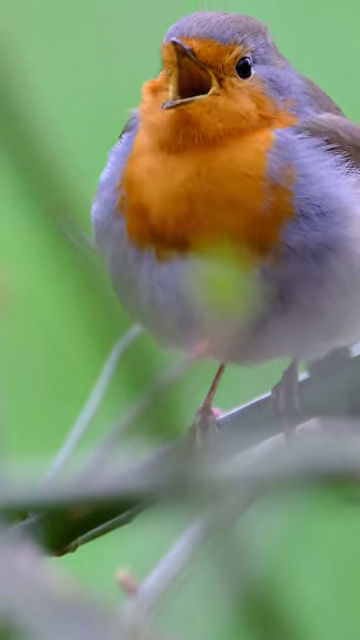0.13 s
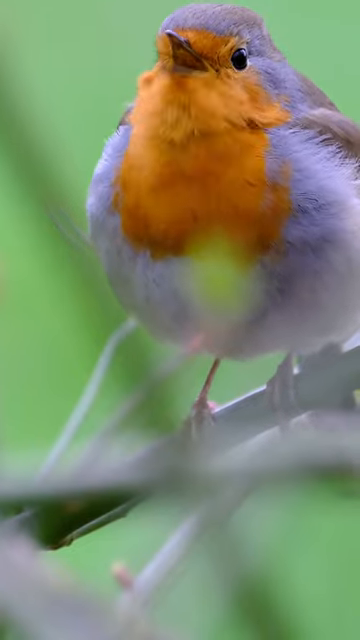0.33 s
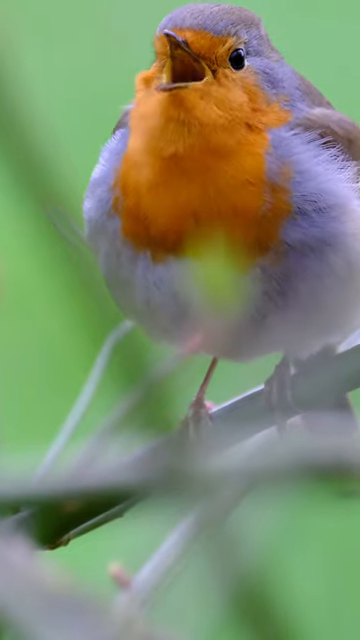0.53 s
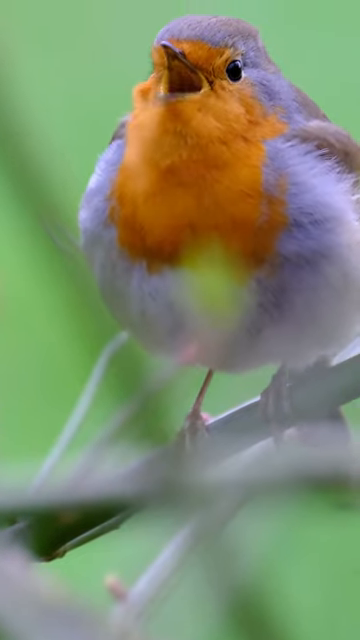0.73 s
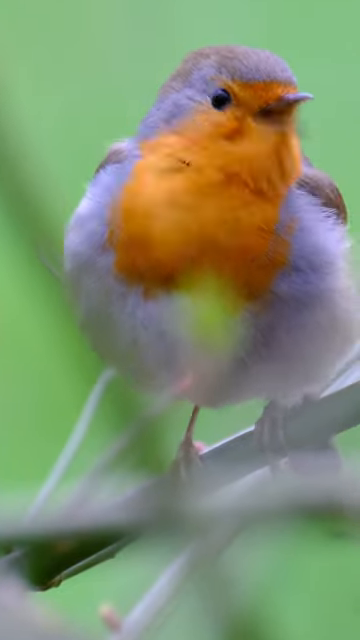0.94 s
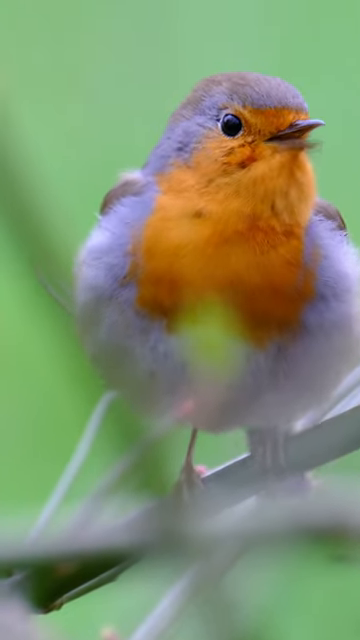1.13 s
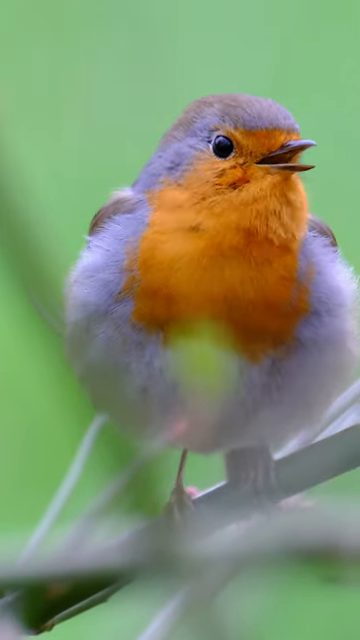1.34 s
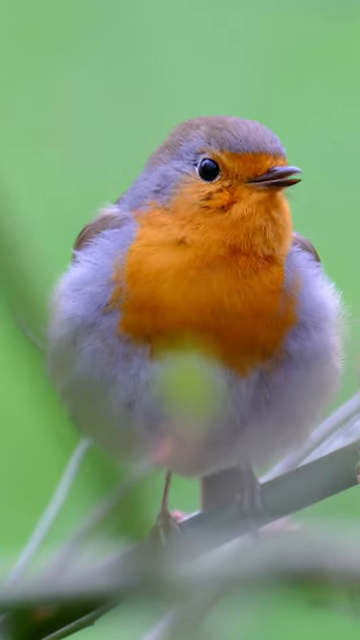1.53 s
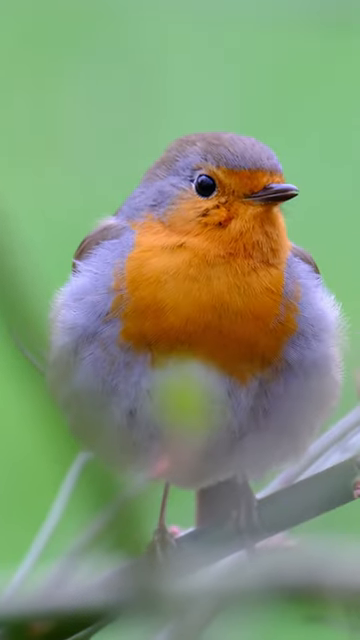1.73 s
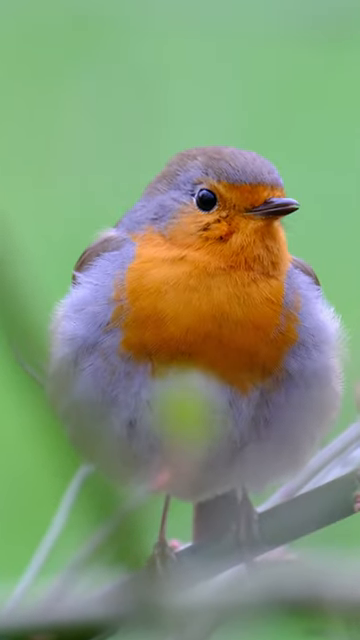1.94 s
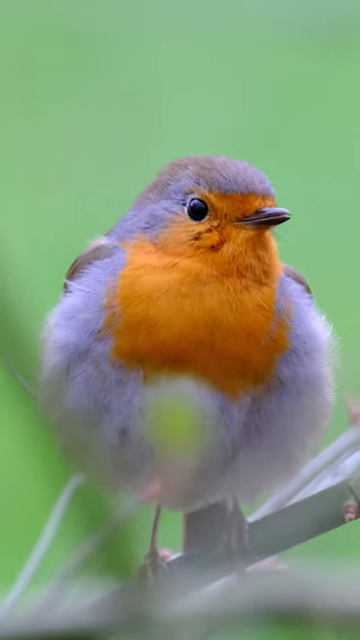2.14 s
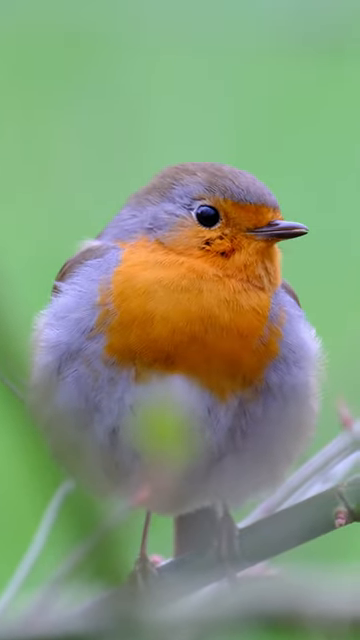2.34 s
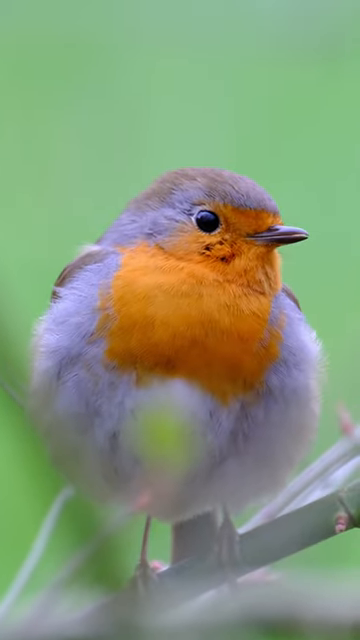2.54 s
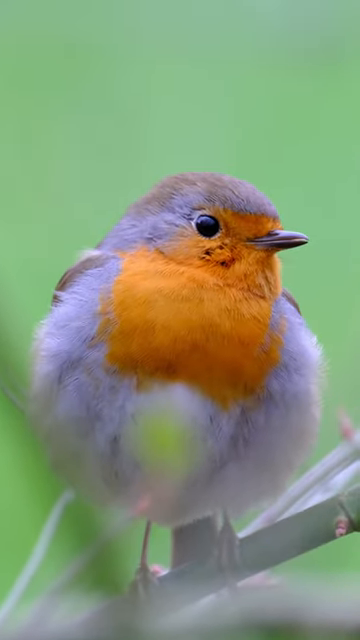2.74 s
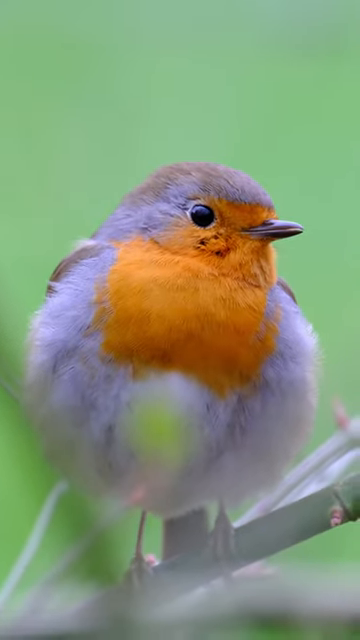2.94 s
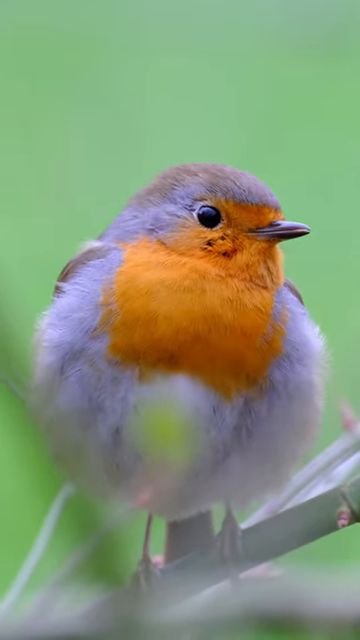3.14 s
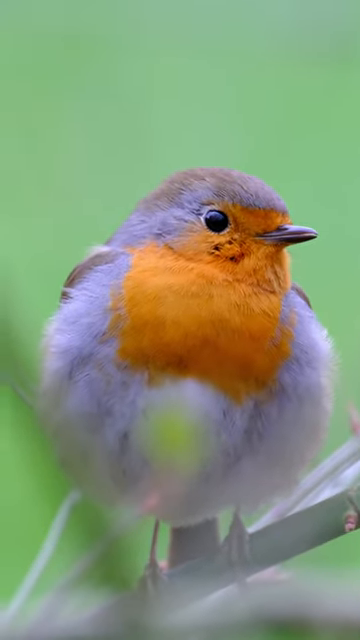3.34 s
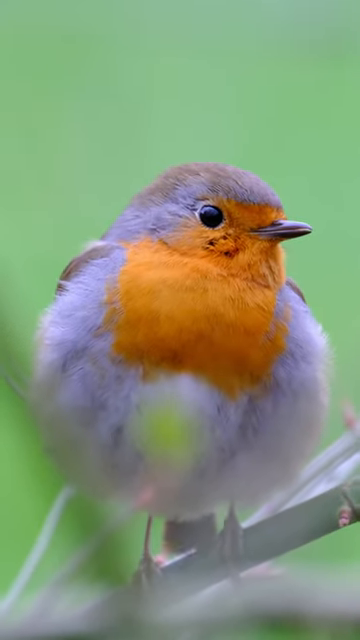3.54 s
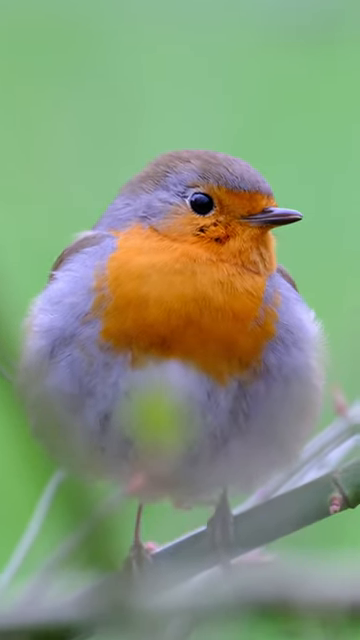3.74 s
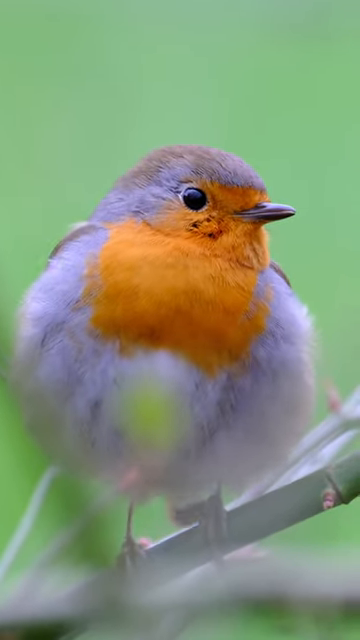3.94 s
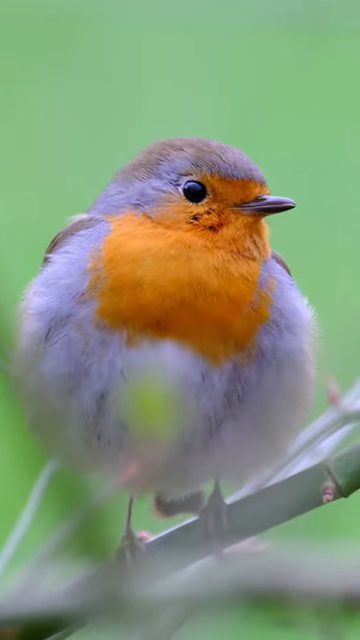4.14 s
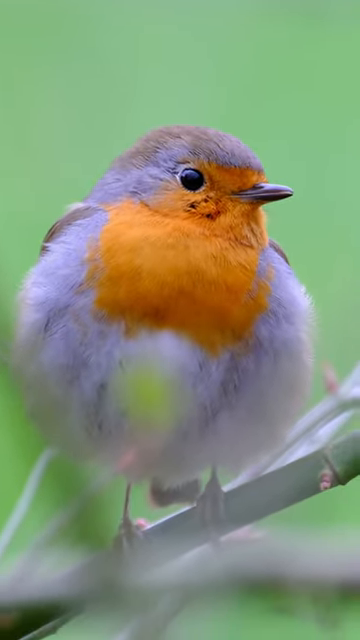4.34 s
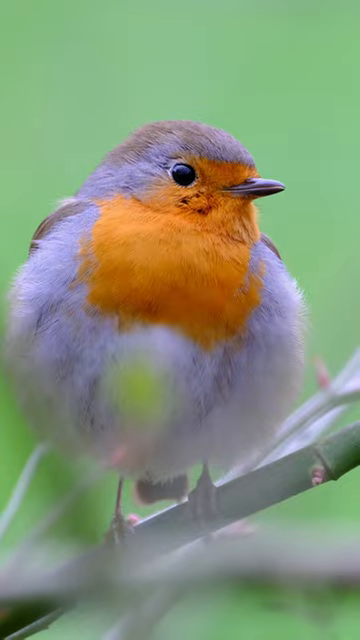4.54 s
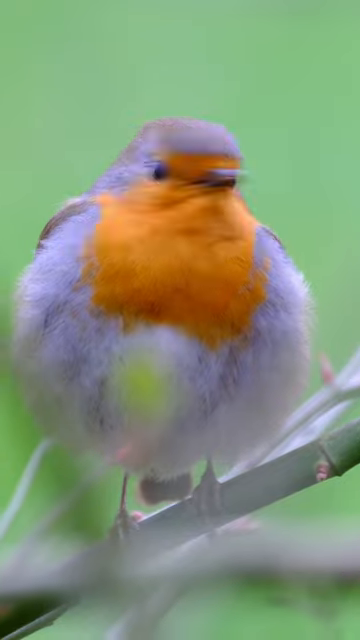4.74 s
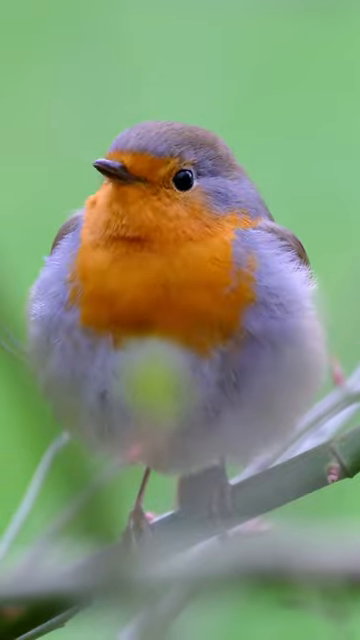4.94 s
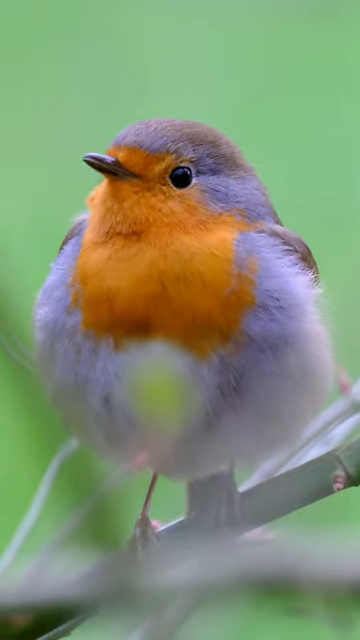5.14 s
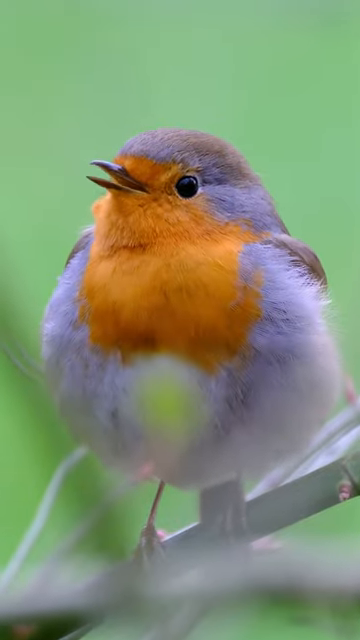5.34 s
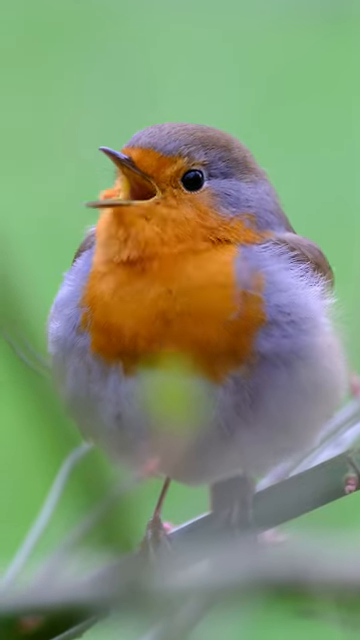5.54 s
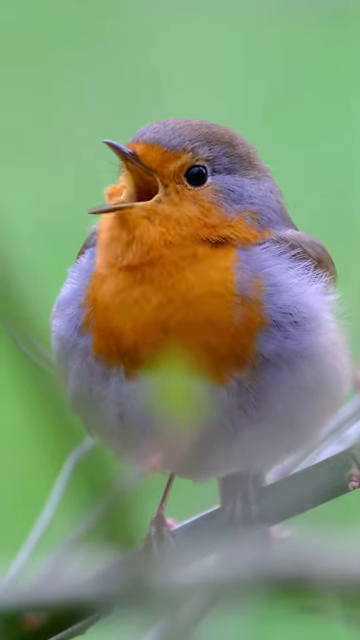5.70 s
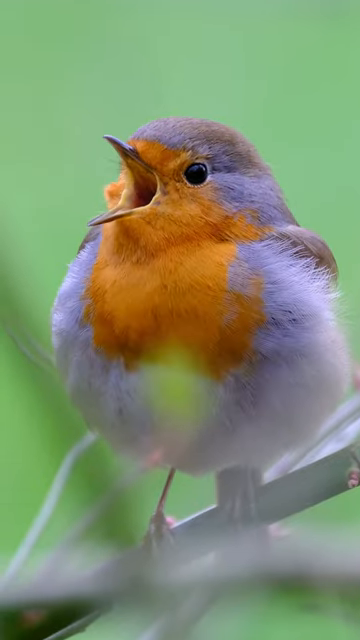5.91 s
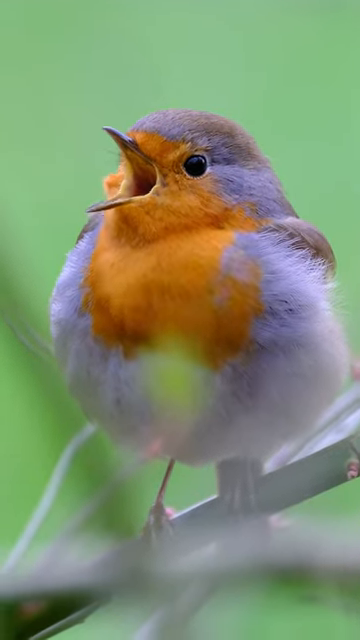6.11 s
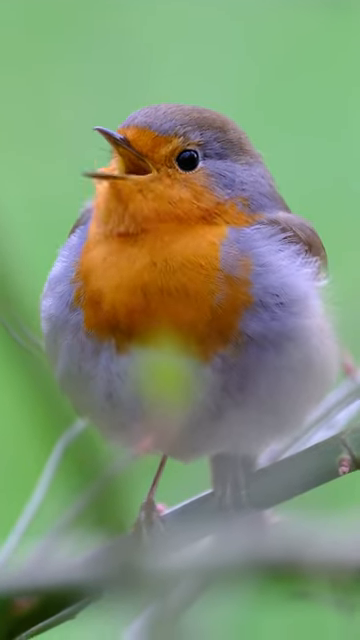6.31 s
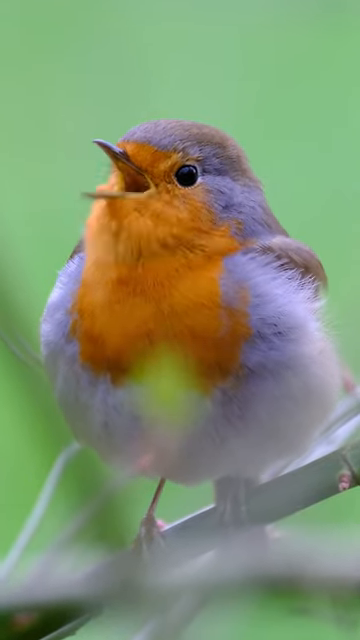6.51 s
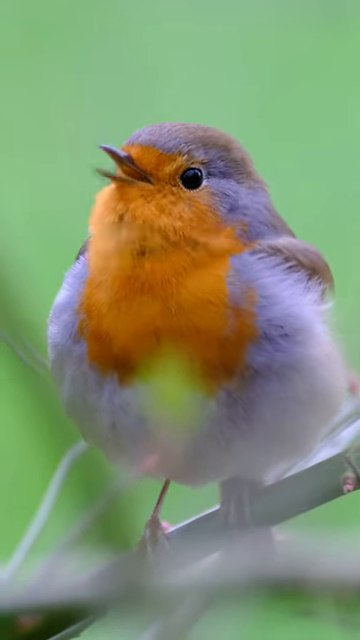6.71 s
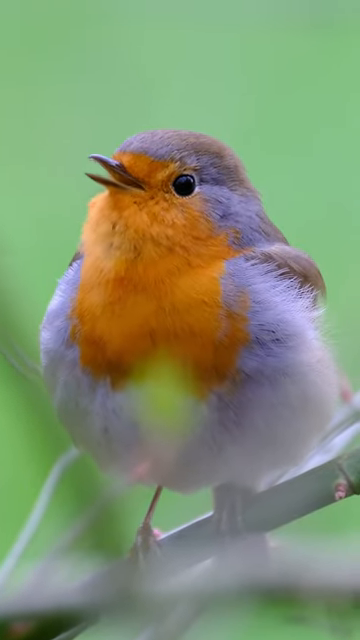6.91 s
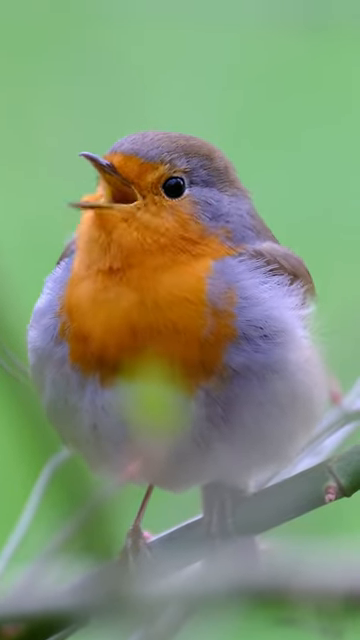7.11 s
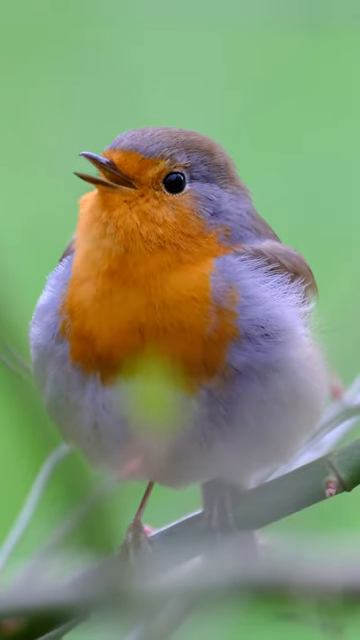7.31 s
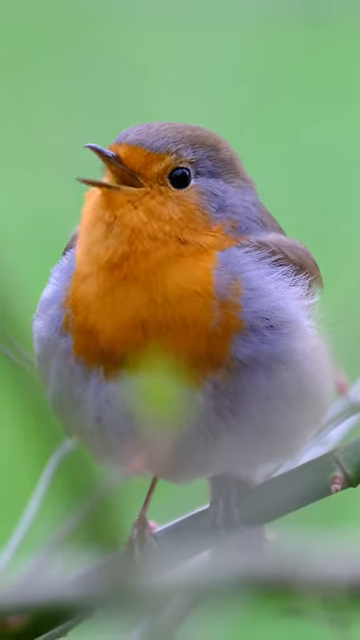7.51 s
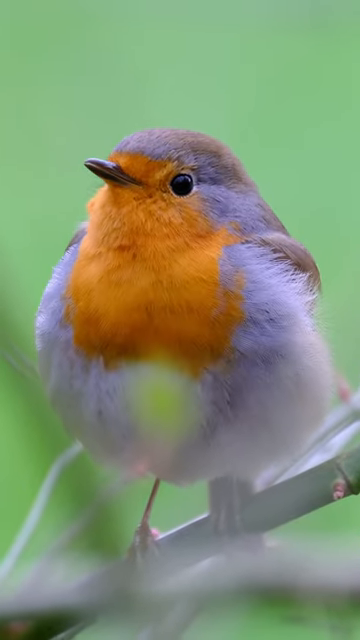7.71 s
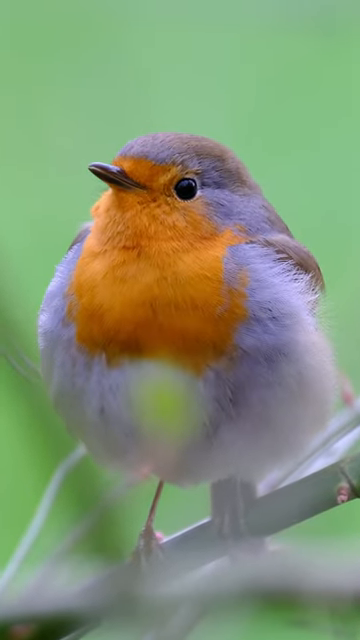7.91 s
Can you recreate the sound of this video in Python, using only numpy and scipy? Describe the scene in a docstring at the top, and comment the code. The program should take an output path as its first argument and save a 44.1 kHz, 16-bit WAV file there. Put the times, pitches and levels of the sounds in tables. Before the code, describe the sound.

Steady dull road wash with a low engine drone and soft breeze rumble lies under everything. A nearby small bird opens with quick, high twittering and a trill, lightly echoed by surrounding trees. For several seconds only distant chirps, a tiny rattle and faint piping are heard. The near bird resumes with very high held whistles, then tumbling fast chirps, before the background is left alone with weak far notes and ticks.

```python
"""The roar and drone of a distant road and a light breeze on two microphone ports run throughout.
A robin on a twig close by opens with a quick phrase; its two syrinx halves give near-pure gliding
whistles that the wood around echoes. From about 1.8 s other birds answer far off, duller and
drowned in echo, and dry twig ticks of bright noise dot the scene. After 5 s the robin sings again."""
import sys
import numpy as np
from scipy import signal
from scipy.fft import rfft, irfft
from scipy.io import wavfile
from scipy.ndimage import uniform_filter1d

SR = 44100
rng = np.random.default_rng(int(sys.argv[2]) if len(sys.argv) > 2 else 0)


def pcm_store(signal):
    """Save signal as 16-bit PCM."""
    levels = np.round(np.clip(np.atleast_2d(signal), -1, 1) * 32767)
    wavfile.write(sys.argv[1], SR, levels.astype(np.int16).T)


N = 351036
TIME = np.arange(N) / SR

# Road colour, relative density: f/Hz, level/dB
ROAD_COLOUR = [(88, -46), (150, -11), (406, -8.5), (589, -4.5), (805, -5.5), (1190, -0.5), (1600, -2.5),
               (1980, -8.5), (3350, -20), (5360, -25.5), (8560, -37), (12200, -39.5), (13300, -40.5),
               (13850, -30.5), (14500, -37.5), (16000, -50)]
# Share of road power common to both ports: f/Hz, likeness/0-1
ROAD_LIKENESS = [(150, 0.1), (300, 1), (1000, 0.78), (3000, 0.65), (8000, 0), (15000, 0.36)]
# Slow swells: t/s, road level/dB, heavy traffic re tyre roar/dB, breeze re road before a fixed lift/dB
AIR_SWELLS = [(0, -42, -8.5, -11), (1.2, -43, -10, -13), (1.75, -39.5, -8, -17), (2.1, -42, -6.5, -10.5),
              (2.22, -45, -6, -0.5), (2.3, -44.5, -5.5, -18), (2.6, -40.5, -7.5, -21.5),
              (3.6, -41.5, -11, -15.5), (4.57, -42.5, -10, -12.5), (5.4, -41.5, -12, -24),
              (5.9, -45.5, -12.5, -26), (6.9, -44, -12.5, -24), (7.25, -44, -13.5, -27.5),
              (7.96, -41.5, -14.5, -22.5)]
# Far engine drone: t/s, f/Hz, level/dB
ENGINE_DRONE = [(0.0, 50.6, -51), (1.02, 54.6, -61), (2.02, 51.13, -51.5), (7.96, 58.65, -55)]
# Overtones of a whistle before the microphone's brightening: multiple of the pitch/1, level/dB
OVERTONES = [(2, -24), (3, -40), (4, -39.5)]
# The microphone brightens the top, overtones near 13-15 kHz stand out: f/Hz, added level/dB
OVERTONE_BRIGHTNESS = [(5000, -24), (9000, -15.5), (11000, -7.5), (13000, 6), (15500, 5)]
# Camera body's shadow on the near bird, left minus right: f/Hz, level/dB
ROBIN_SIDE = [(3000, 1), (5000, -0.5), (6500, -1), (8000, 4.5), (9500, -1)]
# Colour of the soft noise haze around the whistles, relative density: f/Hz, level/dB
HAZE_COLOUR = [(1500, -18), (3000, 5), (8000, 3.5), (11000, -9), (15000, 3)]
# Straight flicks: start t/s, length/s, from f/Hz, to f/Hz, level/dB
FLICKS = [ (0.302, 0.018, 8440, 7500, -28), (.321, 0.014, 7400, 6320, -28), (.336, .013, 6430, 5200, -28.5),
          (.485, 0.014, 6700, 6100, -26.5), (.663, 0.0066, 6200, 3570, -23), (1.267, 0.02, 4650, 4440, -41),
          (1.385, 0.015, 2900, 4200, -32), (5.169, .032, 7560, 7400, -58), (5.178, 0.031, 8800, 8200, -59),
          (6.069, 0.007, 8300, 7850, -29.5), (6.582, 0.013, 4060, 5880, -20.5),
          (6.626, 0.0064, 4700, 6940, -30), (6.636, 0.0074, 6570, 6100, -43),
          (6.662, 0.015, 2900, 4340, -34), (6.727, 0.0092, 4190, 5000, -21.5),
          (6.781, 0.026, 2360, 2430, -46), (6.782, 0.017, 3300, 3400, -42.5), (6.82, .014, 2630, 3290, -30),
          (6.86, 0.019, 2270, 2370, -45), (6.888, .018, 2430, 3470, -29.5), (7.066, .012, 6500, 6300, -31),
          (7.067, 0.0054, 5530, 5040, -33), (7.077, 0.018, 6370, 7760, -29),
          (7.173, 0.016, 3660, 6070, -24.5), (7.278, .013, 3400, 3160, -24),
          (7.295, .012, 3240, 3070, -33.5), (7.426, 0.015, 4740, 3250, -25.5),
          (7.452, 0.0083, 4200, 5720, -35.5), (7.495, 0.021, 4060, 5000, -32),
          (7.54, 0.0092, 4130, 3530, -29), (7.55, .011, 4670, 5200, -41)]
# Notes that turn once; the fade is the end level relative to the turn:
# start t/s, length/s, from f/Hz, turn f/Hz, to f/Hz, turn share/0-1, level at the turn/dB, fade/dB
BENDS = [ (.002, .025, 2540, 2500, 2625, 0, -40, -10), (.353, 0.014, 4380, 4850, 4580, 0.65, -25, -2),
         (0.37, .019, 4900, 3800, 3600, 0.5, -28.5, -14), (.454, 0.036, 9130, 7700, 7130, 0.48, -27, 1),
         (.495, .013, 5700, 4960, 5240, .4, -21.5, -9), (.507, .02, 4900, 3560, 3850, .35, -32.5, -4),
         (.589, 0.027, 4780, 3860, 3260, 0.2, -22, -11), (.632, .013, 3740, 4100, 5960, 0.1, -26.5, -12),
         (0.692, 0.021, 4180, 5050, 5010, .36, -18, -22), (0.783, 0.016, 5880, 4910, 5240, 0.25, -21, -11),
         (1.364, 0.017, 3670, 4150, 3900, 0.37, -36, -9), (1.423, 0.073, 3040, 3140, 2300, 0.23, -30, -25),
         (5.112, .062, 7200, 7970, 8300, .25, -57, -5), (5.519, .017, 3300, 4300, 10800, .3, -33, -28),
         (5.68, .017, 3100, 4300, 11000, .3, -36, -23), (6.652, .017, 4150, 4650, 6000, .28, -22, -12),
         (6.616, .012, 4360, 4440, 4420, .45, -19.5, -1), (6.732, 0.019, 3750, 3190, 3260, 0.34, -35.5, -4),
         (7.041, 0.023, 4340, 5850, 6700, 0.17, -25.5, -8), (7.089, 0.04, 6100, 6730, 5460, 0.27, -32.5, 5),
         (7.461, 0.033, 4900, 4030, 3200, 0.34, -26, -17), (7.523, .019, 3950, 3660, 4260, 0.16, -25, -9)]
# Trill, a flick and then a hook that drops to a floor and lifts at its end:
# start t/s, flick top f/Hz, flick level/dB, hook top f/Hz, floor f/Hz, lift/Hz,
# hook length/s, hook loudest after/s, hook level/dB
TRILL = [(.7915, 5250, -36, 4820, 3010, 50, 0.03, .009, -28),
         (.855, 6270, -27.5, 5500, 2960, 300, .036, .011, -27.5),
         (.917, 5530, -28, 5920, 2790, 450, 0.041, .007, -28.5),
         (0.986, 5420, -27, 5270, 2870, 80, 0.037, .006, -27.5),
         (1.054, 5200, -28, 4720, 2930, 60, 0.045, .005, -27),
         (1.125, 5450, -29.5, 4600, 2920, 30, .037, .005, -29)]
# Held whistles entered by a scoop: start t/s, length/s, from f/Hz, held f/Hz, end f/Hz, scoop/s,
# level/dB, fade/dB, roughness/dB
HELD = [(1.404, 0.022, 4820, 3320, 3310, .008, -26.5, 3.5, 2),
        (5.523, 0.069, 2180, 5375, 5634, .019, -22, -5, .3),
        (5.684, .075, 2090, 5390, 5400, .016, -21.5, -1, .3),
        (6.016, 0.062, 8600, 8580, 8340, .003, -40.5, 4, 3),
        (6.09, 0.22, 4520, 8620, 8090, .015, -34, -6, 2),
        (6.129, 0.17, 8160, 7900, 7510, 0.0055, -39, .5, 2.5)]
# Robin notes with a shape of their own, a list of points each: t/s, f/Hz, level/dB
FREE_NOTES = [
    [(.107, 8100, -53), (.124, 8820, -37), (.253, 9170, -26), (.278, 9130, -29.5), (.3, 8470, -29)],
    [(1.196, 4630, -41), (1.2, 4370, -26), (1.205, 3880, -34)],
    [(1.208, 5330, -52), (1.212, 3930, -32.5), (1.218, 3290, -32), (1.233, 2920, -36.5),
     (1.252, 3580, -29.5), (1.261, 4230, -29.5), (1.265, 3950, -42)],
    [(5.293, 7400, -55), (5.305, 8060, -52), (5.355, 8420, -42), (5.364, 8400, -46), (5.372, 7960, -50),
     (5.405, 8170, -48), (5.417, 7630, -47), (5.421, 7800, -53)],
    [(5.827, 4840, -59), (5.831, 7050, -33), (5.837, 8090, -26.5), (5.909, 7900, -25.5), (5.919, 7730, -28),
     (5.955, 7700, -26), (5.962, 7600, -29), (5.973, 7430, -26), (6.007, 7435, -27.5)],
    [(6.38, 3520, -44), (6.384, 3850, -23), (6.389, 3990, -24.5), (6.396, 3770, -32), (6.401, 3300, -25),
     (6.407, 3650, -29), (6.41, 4280, -26), (6.415, 3800, -30), (6.423, 3240, -27), (6.433, 3870, -34)],
    [(6.481, 3400, -30), (6.484, 3760, -29.5), (6.491, 3900, -22.5), (6.5, 3380, -28), (6.504, 3760, -25),
     (6.508, 4200, -28), (6.514, 3190, -29), (6.521, 3400, -26.5), (6.525, 3970, -24.5), (6.529, 3340, -32)],
    [(.572, 4650, -48), (.574, 5100, -27), (.58, 5250, -26), (.585, 6350, -38)],
    [(6.53, 5030, -39), (6.546, 5200, -36), (6.554, 5630, -37), (6.559, 4770, -45)],
    [(7.019, 6550, -51), (7.023, 6540, -29), (7.032, 6760, -28), (7.045, 7570, -34), (7.053, 7980, -42)],
    [(7.558, 3720, -36), (7.565, 4380, -31), (7.572, 4470, -29), (7.592, 4300, -33), (7.599, 4100, -37)],
    [(7.189, 2940, -51), (7.196, 4220, -26), (7.199, 4570, -23.5), (7.226, 3500, -25.5), (7.242, 3640, -31),
     (7.253, 3400, -28.5)],
]
# Far birds, sliding notes with bends in pitch or level, a list of points each: t/s, f/Hz, level/dB
FAR_SLIDES = [
    [(1.8, 5600, -56), (1.808, 6280, -56), (1.82, 5820, -50.5), (1.845, 5890, -56)],
    [(2.67, 7600, -53), (2.7, 5840, -52), (2.73, 5740, -54), (2.77, 4500, -66)],
    [(2.965, 7060, -50), (2.975, 6800, -55), (2.993, 4280, -49), (3.008, 4230, -51), (3.035, 4490, -51),
     (3.068, 3930, -45), (3.078, 3920, -45)],
    [(3.2, 4050, -49), (3.245, 3650, -44), (3.27, 3170, -46), (3.284, 3100, -44)],
]
# Far birds, straight notes: start t/s, length/s, from f/Hz, to f/Hz, level/dB
FAR_NOTES = [ (1.882, 0.056, 6750, 6670, -55.5), (1.968, .047, 6950, 6860, -52.5),
             (2.065, 0.041, 7020, 6900, -55), (2.171, 0.026, 5500, 3960, -56),
             (2.62, .03, 3510, 3300, -56.5), (2.87, 0.2, 3660, 3690, -61.5), (3.085, .025, 5240, 4800, -61),
             (3.305, 0.015, 3900, 3190, -49), (3.46, 0.038, 2946, 3200, -56.5), (3.6, .1, 3690, 3700, -74),
             (3.72, 0.12, 7800, 7820, -69), (3.83, .11, 4380, 4340, -67), (3.95, .2, 4050, 3980, -65.5),
             (4.07, 0.086, 3750, 3770, -69), (7.8, .025, 6770, 6940, -56.5),
             (7.858, 0.072, 6800, 6780, -60)]
# Far rattle of short rising pips: start t/s, from f/Hz, level/dB
RATTLE = [(2.202, 3800, -54), (2.216, 3600, -53), (2.235, 3600, -53), (2.253, 3580, -56), (2.27, 3300, -54),
          (2.307, 3200, -52)]
# Far piping, one sagging whistle repeated: start t/s, from f/Hz, level/dB
PIPING = [(4.06, 4520, -64), (4.269, 4700, -63.5), (4.51, 4580, -66), (4.75, 4500, -65),
          (5.02, 4590, -66.5), (5.23, 4580, -63.5), (5.421, 4570, -62)]
# Twig ticks: t/s, noise level before trim and high-pass/dB
TICKS = [(1.8043, -46), (4.3306, -51), (4.6833, -50), (7.8271, -41), (7.8466, -38)]

ROAD_LAG_S, ROAD_FLICKER_DB, HISS_FLICKER_DB = 0.00013, 0.5, 0.6
ROBIN_WAVER = 0.003  # relative pitch spread
FAST_GLIDE = 280000  # Hz per s at which the noise haze is fullest
ROBIN_WET_DB, FAR_WET_DB, SWAY_DB = -12, -2, 5
FLICK_RISE, FLICK_FALL = 0.49, 0.48  # shares of the length
FLICK_ONSET_DB, FLICK_END_DB, BEND_ONSET_DB = -15, -8.5, -10.5  # relative to the note's given level
TRILL_FLICK_S, TRILL_FLICK_END_HZ, HOOK_AFTER_S = 0.009, 3740, 0.0095
HOOK_DROP_S, HOOK_SAG_S, HOOK_SAG_DB, HOOK_END_DB = 0.0072, 0.018, -6, -12
SCOOP_ONSET_DB, SCOOP_CURVE, RELEASE_S, RELEASE_DB = -29, 2.8, 0.007, -10
HOOK_ROUGHNESS_DB, FREE_ROUGHNESS_DB, BEND_ROUGHNESS_DB = 3.5, 2.2, 2.5
ROUGHNESS_HZ, WOBBLE_HZ_PER_DB = 260, 18.5
FAR_FADE_DB = -1.5
RATTLE_PIP_S, RATTLE_RISE_HZ = 0.0073, 420
PIPING_S, PIPING_SAG_HZ = 0.12, 150
TOP_HZ = 15900


def undb(db):
    """Decibels to amplitude."""
    return 10 ** (np.asarray(db) / 20)


def unit(x):
    """Scales to an RMS of 1."""
    return x / np.sqrt(np.mean(x ** 2))


def on_log(table, hz):
    """Reads (Hz, value) points on a log-frequency axis."""
    f, v = np.transpose(table)
    return np.interp(np.log(np.maximum(hz, 1)), np.log(f), v)


def curves(table):
    """Draws each column after the first as a curve over the whole scene."""
    s, *columns = np.transpose(table)
    return [np.interp(TIME, s, c) for c in columns]


def walk(rate):
    """Random levels held 1 / rate s and slewed twice; spread near 1."""
    k = int(SR / rate)
    held_levels = np.repeat(rng.standard_normal(N // k + 1), k)
    return 1.53 * uniform_filter1d(uniform_filter1d(held_levels, k), k)[:N]


def shaped(gain):
    """Noise with the given gain at each frequency."""
    return irfft(rfft(rng.standard_normal(N)) * gain, N)


def road_bands(hz):
    """Noise at two ports, partly shared and later at the left, split into heavy, tyre and hiss bands."""
    colour = undb(on_log(ROAD_COLOUR, hz))
    like = np.clip(on_log(ROAD_LIKENESS, hz), 0, 1)
    common = rfft(rng.standard_normal(N)) * np.sqrt(like)
    late = np.exp(-2j * np.pi * hz * ROAD_LAG_S)
    ports = colour * np.array([common * lag + rfft(rng.standard_normal(N)) * np.sqrt(1 - like)
                               for lag in (late, 1)])
    low = 1 / (1 + (hz / 650) ** 6)
    high = 1 / (1 + (2600 / np.maximum(hz, 1)) ** 6)
    return [irfft(ports * part, N) for part in (low, 1 - low - high, high)]


def breeze_buffets(hz, level_db):
    """Air buffets the ports with low rumble, partly shared and partly each port's own."""
    band = (hz / 45) ** 2 / (1 + (hz / 45) ** 2) / (1 + (hz / 130) ** 4)
    shared = shaped(band)
    buffets = np.array([unit(0.78 * shared + shaped(band)) for _ in range(2)])
    return buffets * undb(level_db + 5.5 + 1.9 * walk(8.2))


def engine_drone():
    """A far engine hums as one low sine, unsteady in pitch and level and a little louder at the right."""
    drone_hz, drone_db = curves(ENGINE_DRONE)
    phase = 2 * np.pi * np.cumsum(drone_hz * (1 + 0.012 * walk(4.93))) / SR
    drone = np.sqrt(2) * undb(drone_db + 1.8 * walk(6)) * np.sin(phase)
    return drone * undb(0.67 * np.array([walk(4), walk(3.1)]) + np.array([[-0.8], [0.8]]))


def background():
    """Tyre roar reaches the right port first; heavy traffic swells apart; breeze and drone lie below."""
    road_db, heavy_db, breeze_db = curves(AIR_SWELLS)
    hz = np.fft.rfftfreq(N, 1 / SR)
    heavy, tyres, hiss = road_bands(hz)
    scale = np.std(tyres)
    traffic = tyres / scale + undb(heavy_db + 1.2 * walk(4.9)) * unit(heavy)
    road = undb(road_db + ROAD_FLICKER_DB * walk(5)) * traffic * undb(np.array([[-0.5], [0.5]]))
    # the thin top end (leaves, the microphone's own hiss) does not follow the road's swells
    top = undb(-40.5 + HISS_FLICKER_DB * walk(4.13)) * hiss / scale
    return road + breeze_buffets(hz, road_db + breeze_db) + engine_drone() + top


def whistles(notes, edge_s, waver, flutter_db):
    """Gliding sines with faint overtones and a random flutter; also the level of the haze around them."""
    out = np.zeros((2, N))
    drift = 1 + waver * walk(300)
    flutter = undb(flutter_db * walk(150))
    for note in notes:
        s, hz, db = np.transpose(note)
        a, b = int((s[0] - edge_s) * SR), min(int((s[-1] + edge_s) * SR), N)
        t = TIME[a:b]
        nearest_end = np.minimum(t - t[0], t[-1] - t)
        edges = np.sin(np.pi / 2 * np.clip(nearest_end / (2 * edge_s), 0, 1)) ** 2
        drawn_pitch = np.interp(t, s, hz)
        pitch = uniform_filter1d(drawn_pitch, size=66) * drift[a:b]
        phase = 2 * np.pi * np.cumsum(pitch) / SR
        tone = np.sin(phase)
        for k, overtone_db in OVERTONES:
            gain = undb(overtone_db + on_log(OVERTONE_BRIGHTNESS, k * pitch)) * (k * pitch < SR / 2)
            tone += gain * flutter[a:b] * np.sin(k * phase)
        size = np.sqrt(2) * np.interp(t, s, undb(db)) * edges
        glide = np.abs(np.gradient(drawn_pitch)) * SR / FAST_GLIDE
        out[:, a:b] += size * np.array([flutter[a:b] * tone, np.clip(glide, 0.1, 1)])
    return out


def wood(x, near_t60, far_t60, far_db, gap_s):
    """Bushes soon die away, trunks further off ring on; each port hears other paths."""
    t = TIME[:SR]
    near = np.exp(-np.log(1000) * t / near_t60)
    far = undb(far_db) * np.exp(-np.log(1000) * t / far_t60)
    paths = rng.standard_normal((2, SR)) * (near + far) * np.clip(t / gap_s, 0, 1) ** 2
    paths /= np.sqrt(np.sum(paths ** 2) / 2)
    return signal.fftconvolve(x[None], paths, axes=1)[:, :N]


def steps(length):
    """Times through a note, about one a millisecond."""
    return np.linspace(0, length, max(int(length * 1000), 3))


def bend(start, length, from_hz, turn_hz, to_hz, turn, db, fade_db):
    """Two glides that meet at the turn."""
    turn_s = start + length * np.clip(turn, 0.02, 0.98)
    return [(start, from_hz, db + BEND_ONSET_DB), (turn_s, turn_hz, db),
            (start + length, to_hz, db + fade_db)]


def flick(start, length, from_hz, to_hz, db):
    """Straight glide that swells, holds briefly and fades."""
    share = np.array([0, min(FLICK_RISE, FLICK_FALL), max(FLICK_RISE, FLICK_FALL), 1])
    level_db = db + np.array([FLICK_ONSET_DB, 0, 0, FLICK_END_DB])
    return np.transpose([start + length * share, from_hz + (to_hz - from_hz) * share, level_db])


def hook(start, top_hz, floor_hz, lift_hz, length, peak, db):
    """The pitch relaxes onto its floor and lifts at the end; the level peaks early and sags."""
    t = steps(length)
    drop = (top_hz - floor_hz) * np.exp(-t / HOOK_DROP_S)
    pitch = floor_hz + drop + lift_hz * (t / length) ** 4
    shape_db = np.interp(t, [0, peak, HOOK_SAG_S, length],
                         [BEND_ONSET_DB, 0, HOOK_SAG_DB, HOOK_END_DB])
    return np.transpose([start + t, pitch, db + shape_db])


def held(start, length, from_hz, held_hz, end_hz, scoop, db, fade_db):
    """A scoop eases into a slowly drifting whistle."""
    t = steps(length)
    entry = np.minimum(t / scoop, 1)
    scooped = from_hz + (held_hz - from_hz) * np.sin(np.pi / 2 * entry)
    pitch = scooped + (end_hz - held_hz) * t / length
    onset_db = SCOOP_ONSET_DB * (1 - entry) ** SCOOP_CURVE
    release_db = RELEASE_DB * np.clip(1 - (length - t) / RELEASE_S, 0, 1)
    return np.transpose([start + t, pitch, db + onset_db + fade_db * t / length + release_db])


def roughened(note, chance, roughness_db):
    """Random roughness in level and pitch, growing through the note, as when echoes beat with it."""
    s, hz, db = np.transpose(note)
    t = s[0] + steps(s[-1] - s[0])
    depth = roughness_db * np.sqrt((t - t[0]) / (t[-1] - t[0]))
    roughness, wobble = (np.interp(t, TIME, c) for c in chance)
    level_db = 20 * np.log10(np.interp(t, s, undb(db)))
    pitch = np.interp(t, s, hz) + WOBBLE_HZ_PER_DB * depth * wobble
    return np.transpose([t, pitch, level_db + depth * roughness])


def robin_song():
    """Every note of the near singer as (s, Hz, dB) points."""
    chance = walk(ROUGHNESS_HZ), walk(ROUGHNESS_HZ)
    notes = [flick(*row) for row in FLICKS]
    notes += [roughened(bend(*row), chance, BEND_ROUGHNESS_DB) for row in BENDS]
    notes += [roughened(note, chance, FREE_ROUGHNESS_DB) for note in FREE_NOTES]
    notes += [roughened(held(*row), chance, roughness_db) for *row, roughness_db in HELD]
    for start, top_hz, db, *rest in TRILL:
        notes.append(flick(start, TRILL_FLICK_S, top_hz, TRILL_FLICK_END_HZ, db))
        notes.append(roughened(hook(start + HOOK_AFTER_S, *rest), chance, HOOK_ROUGHNESS_DB))
    return notes


def robin():
    """The near singer, coloured a little differently at each port, with a noise haze and echoes."""
    song, haze_level = whistles(robin_song(), edge_s=0.0015, waver=ROBIN_WAVER, flutter_db=0.9)
    hz = np.fft.rfftfreq(N, 1 / SR)
    side = undb(on_log(ROBIN_SIDE, hz) / 2)
    direct = irfft(rfft(song) * np.array([side, 1 / side]), N)
    # leaves on either side throw high notes back within milliseconds, in opposite sign at the two ports
    leaves = unit(rng.standard_normal(600) * np.exp(-TIME[:600] / 0.0052)) / np.sqrt(600)
    glint = irfft(rfft(song) * rfft(leaves, N) * undb(-8) * hz / 6000, N) * np.array([[1], [-1]])
    # soft noise haze around the whistles, stronger in fast glides
    haze_gain = undb(on_log(HAZE_COLOUR, hz))
    haze = np.array([unit(shaped(haze_gain)) for _ in range(2)]) * uniform_filter1d(haze_level, size=500)
    echo = wood(song, near_t60=0.15, far_t60=0.68, far_db=-15.0, gap_s=0.017)
    return direct + glint + undb(-19.5) * haze + undb(ROBIN_WET_DB) * echo


def far_song():
    """Slides as drawn; straight notes, rattle and piping start at full level and fade a little."""
    rows = FAR_NOTES + [(s, RATTLE_PIP_S, hz, hz + RATTLE_RISE_HZ, db) for s, hz, db in RATTLE]
    rows += [(s, PIPING_S, hz, hz - PIPING_SAG_HZ, db) for s, hz, db in PIPING]
    return FAR_SLIDES + [[(s, from_hz, db), (s + length, to_hz, db + FAR_FADE_DB)]
                         for s, length, from_hz, to_hz, db in rows]


def far_birds():
    """Distant singers with a late, dull echo; the air has taken their overtones."""
    song = whistles(far_song(), edge_s=0.0025, waver=0.0063, flutter_db=2.5)[0]
    song = signal.sosfilt(signal.butter(6, 9000, fs=SR, output="sos"), song)
    # moving air and leaves blur what travels the long way
    swayed = song * undb(SWAY_DB * walk(400))
    echo = wood(swayed, near_t60=0.18, far_t60=1.45, far_db=0, gap_s=0.054)
    dull_echo = signal.sosfilt(signal.butter(1, 6000, fs=SR, output="sos"), echo)
    return song + undb(FAR_WET_DB) * dull_echo


def ticks():
    """Dry twig snaps: a few milliseconds of bright noise."""
    out = np.zeros((2, N))
    for s, db in TICKS:
        i = int(s * SR)
        out[:, i:i + 400] += undb(db - 0.5) * rng.standard_normal(400) * np.exp(-TIME[:400] / 0.0012)
    return signal.sosfilt(signal.butter(2, 7000, "high", fs=SR, output="sos"), out)


def scene():
    """Layers road and breeze, robin, far birds and twig ticks."""
    return background() + robin() + far_birds() + ticks()


def record(dry):
    """The camera cuts the deepest bass and the top."""
    dry = signal.sosfilt(signal.butter(1, 25, "high", fs=SR, output="sos"), dry)
    return signal.sosfilt(signal.ellip(10, 0.2, 80, TOP_HZ, fs=SR, output="sos"), dry)


dry = scene()
out = record(dry)
pcm_store(out)
```